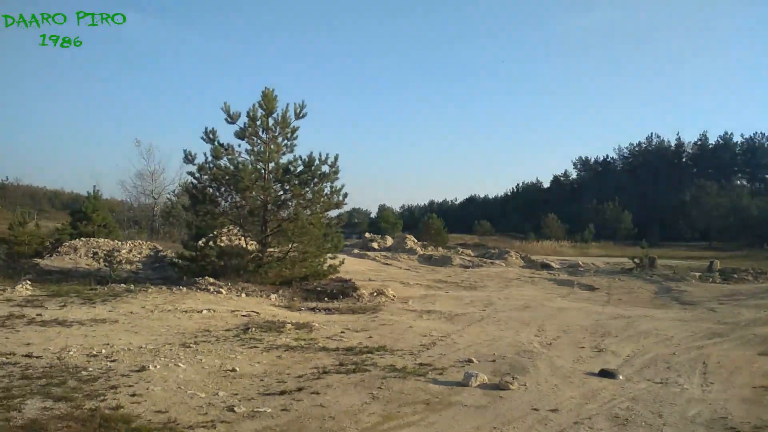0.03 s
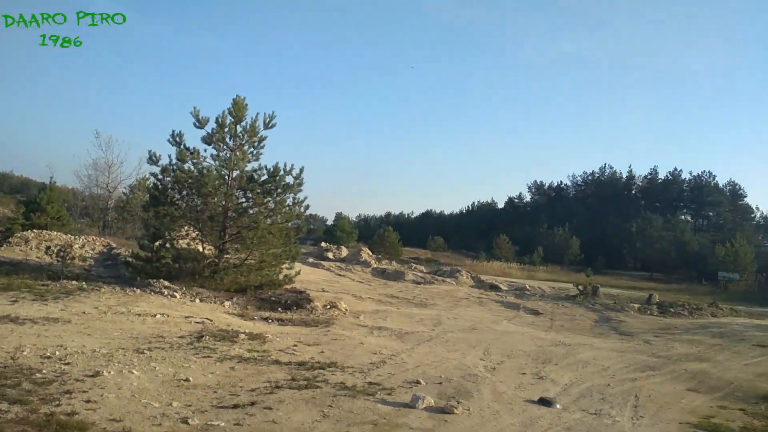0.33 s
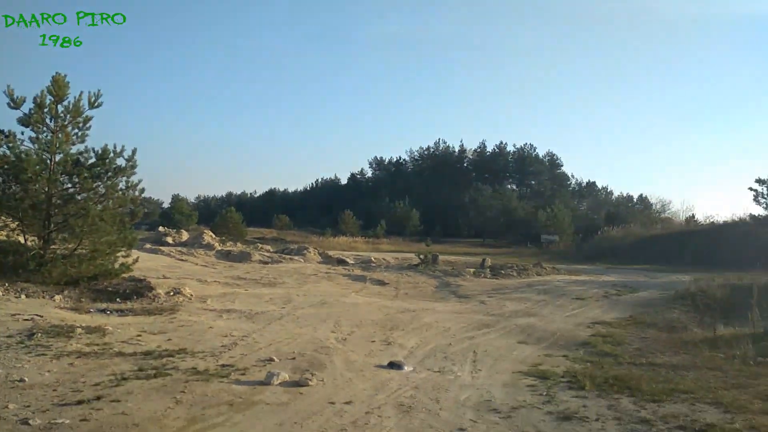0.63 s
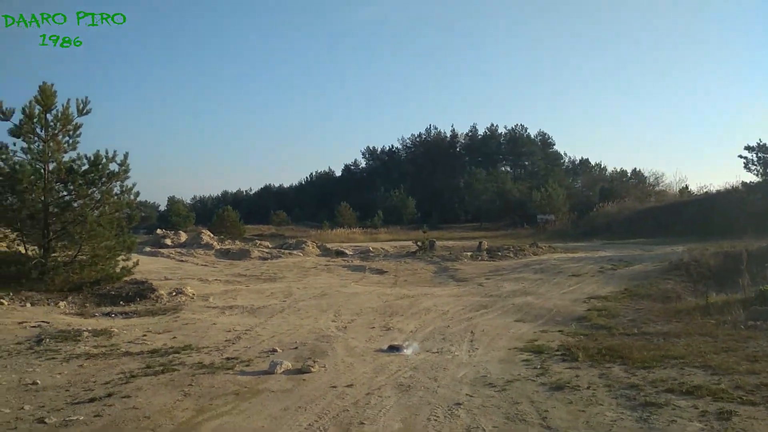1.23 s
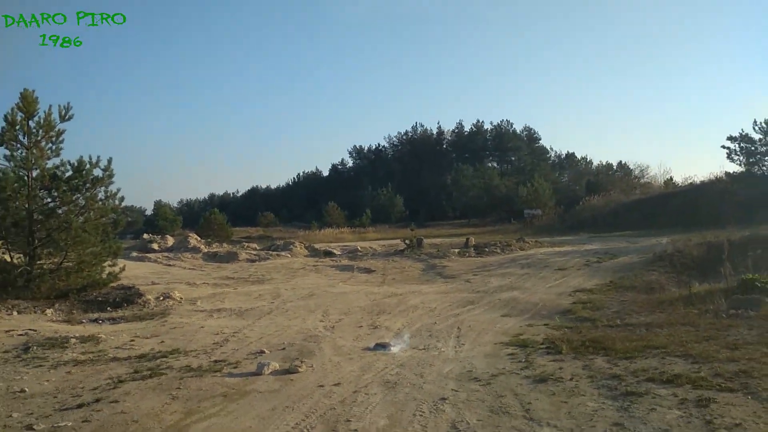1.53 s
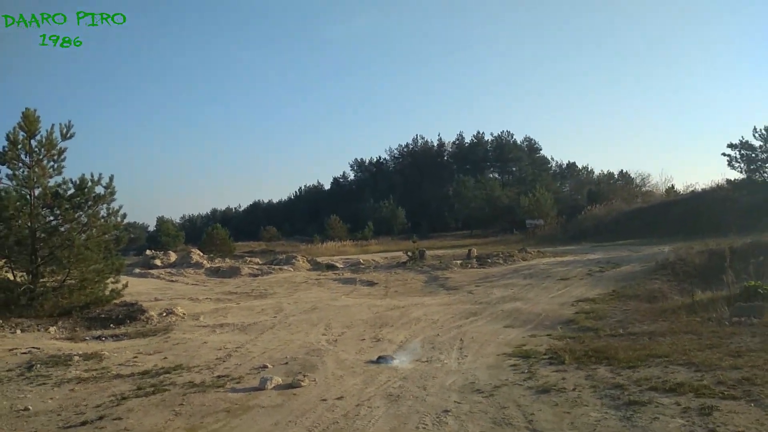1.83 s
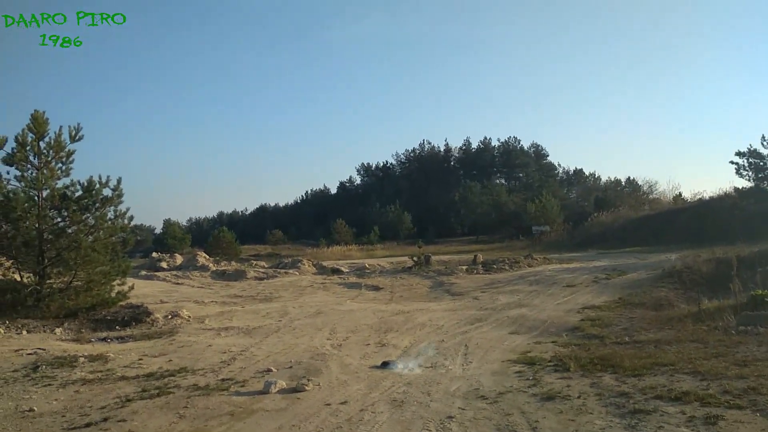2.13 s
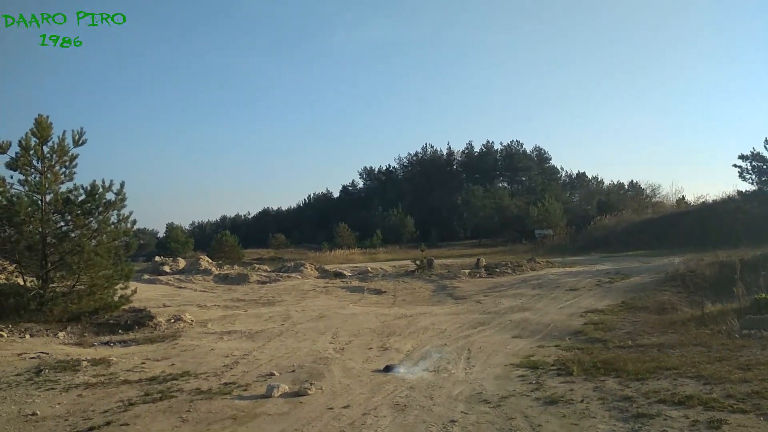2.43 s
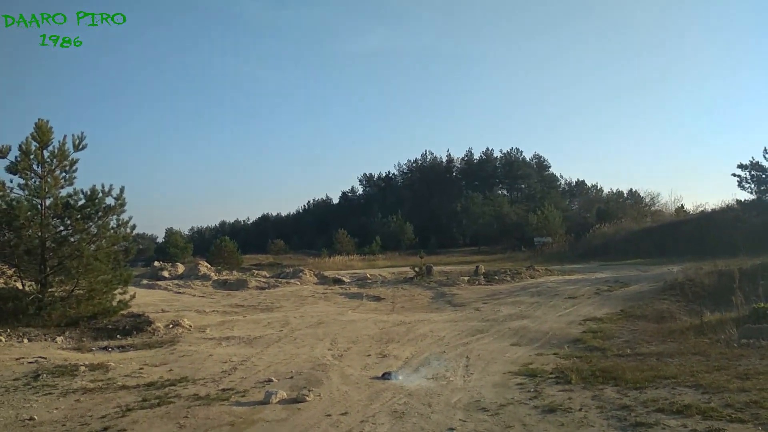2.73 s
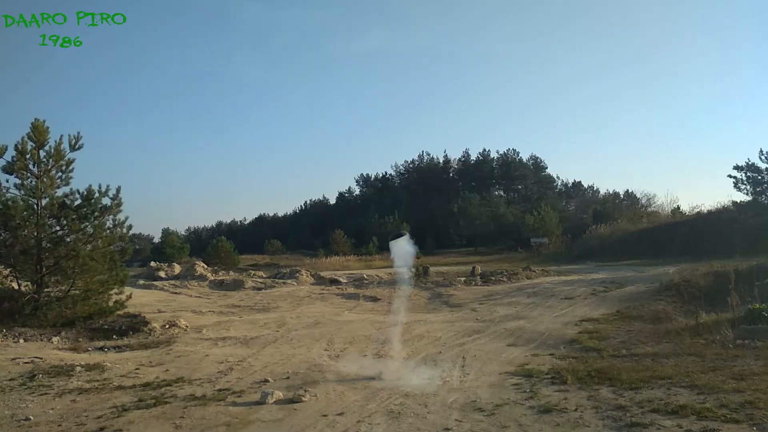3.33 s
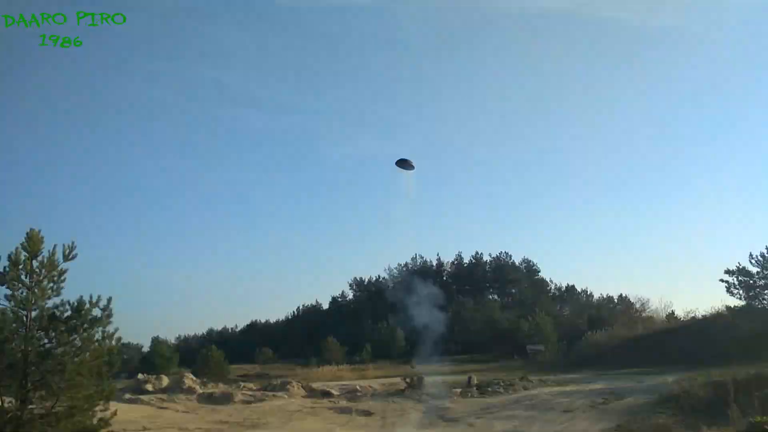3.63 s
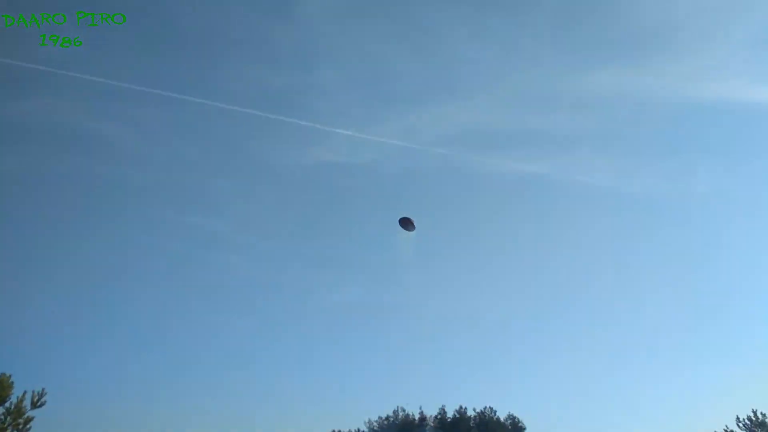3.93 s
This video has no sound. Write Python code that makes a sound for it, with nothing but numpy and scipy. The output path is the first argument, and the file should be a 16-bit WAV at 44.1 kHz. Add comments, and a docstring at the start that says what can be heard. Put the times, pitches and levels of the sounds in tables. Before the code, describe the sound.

One loud firecracker blast outdoors throws a metal bowl upward, ringing and wavering, while sand sprays and echoes rumble back. Before it, shoes scuff softly, a fuse fizzes briefly and light wind buffets the microphone.

```python
"""Firecracker under a metal bowl

Outdoors on sandy ground, light wind on the microphone. Shoes scuff back, a fuse hisses briefly under
the bowl, and only the wind, a few ticks and a far-off call remain. The firecracker goes off with a
sharp double blast and throws the bowl up, ringing as it tumbles. Stone heaps nearby slap the crack
back, banks and trees further out return a rumble and dull echoes, and blown sand hisses in surges."""
import sys
import numpy as np
from scipy import signal
from scipy.io import wavfile

SR = 44100
rng = np.random.default_rng(int(sys.argv[2]) if len(sys.argv) > 2 else 0)


def materialize(psi):
    """Save the field psi as 16-bit PCM at rate SR to the path in sys.argv[1].

    A 1-D psi becomes a single channel; in a 2-D psi each row is a channel.
    """
    bounded = np.clip(np.atleast_2d(psi).T, -1, 1)
    quanta = np.round(bounded * 32767).astype(np.int16)
    wavfile.write(sys.argv[1], SR, quanta)


N = 176400
T = np.arange(N) / SR
BANG_S, BLAST_LOW_HZ = 3.2966, 105

# likeness of the two channels for most noises: (frequency [Hz], correlation [ratio])
LIKENESS = [(40, 0.76), (130, .9), (300, 0.91), (600, 0.37), (1100, 0.28), (2200, 0.11), (5000, 0.23),
            (12000, 0.083)]
# wind on the microphone: (frequency [Hz], density [dB])
WIND_SPECTRUM = [(25, -6.5), (50, -0.5), (85, 1), (130, -7), (220, -15.5), (320, -32.5), (500, -40)]
# gusts: (time [s], level [dB])
WIND_LEVEL = [(0, -51.5), (.3, -49), (.45, -44), (.6, -46.5), (.75, -51), (1.0, -53.5), (1.2, -59),
              (1.5, -58), (1.75, -56), (2.0, -51.5), (2.2, -49.5), (2.48, -55.5), (2.7, -51), (3.0, -51),
              (3.25, -54.5)]
# the wind leans to the right: (frequency [Hz], left minus right [dB])
WIND_PAN = [(30, -8), (90, -3.5), (300, -3.5)]
# likeness of the wind in the two channels: (frequency [Hz], correlation [ratio])
WIND_LIKENESS = [(50, 0.18), (130, 0.87), (300, 0.26), (700, 0.22)]
# soft outdoor wash: (frequency [Hz], density [dB])
WASH_SPECTRUM = [(200, -2.5), (290, 3), (500, -3), (700, -26.5), (1100, -26), (2000, -34.5), (4000, -44)]
# its slow swells: (time [s], level [dB])
WASH_LEVEL = [(0, -71.5), (.8, -63.5), (1.3, -65.5), (1.7, -75), (2.2, -70.5), (2.6, -79.5), (3.2, -78.5)]
# throat resonances of the far caller: (centre [Hz], width [Hz], level [dB])
THROAT_BANDS = [(1487, 132, 1), (1678, 96, -0.5)]
# small dry ticks: (time [s], level [dB], centre [Hz], t60 [s])
TICKS = [(1.553, -73, 1850, 0.084), (1.553, -75.5, 4320, 0.056), (1.554, -60.5, 11860, 0.092),
         (1.832, -69, 1070, 0.1), (2.121, -83, 3200, .03), (2.39, -83, 4320, .06),
         (2.957, -75.5, 4950, .03)]

# sand crushed underfoot: (frequency [Hz], density [dB])
CRUNCH_SPECTRUM = [(150, -8), (400, -5), (900, -2), (1500, 2), (2200, -8.5), (4000, -11.5), (7000, -23.5),
                   (16000, -38.5)]
# grit dragged by the sole: (frequency [Hz], density [dB])
GRIT_SPECTRUM = [(2000, -21), (4500, -13.5), (7000, -4.5), (11000, 4.5), (15500, 5)]
# faint rustle between the steps: (time [s], crunch [dB], grit [dB])
RUSTLE_LEVEL = [(0, -70, -75), (.27, -58, -63.5), (.45, -77, -83), (.6, -65, -66.5), (.85, -73.5, -68),
                (1.03, -82.5, -75), (1.13, -68, -78), (1.22, -80, -79), (1.45, -94, -93.5),
                (1.7, -104, -106), (3.2, -104, -106)]
# shoe scuffs: (start [s], length [s], crunch [dB], grit [dB], top of the crunch [Hz])
SCUFFS = [(0.084, 0.041, -52.5, -52, 9100), (0.183, 0.072, -48, -61.5, 9400),
          (0.295, .016, -37.5, -64.5, 1950), (0.508, 0.04, -38.5, -50, 7140),
          (0.679, 0.074, -55.5, -82, 4700), (1.066, 0.032, -62.5, -69, 6850),
          (1.24, 0.079, -76.5, -90, 2750)]
# stones knocked under the sole: (time [s], peak [dB], centre [Hz])
STONES = [(0.091, -43, 2160), (0.099, -38, 1830), (0.124, -39, 7000), (0.155, -48, 2430),
          (0.1927, -40, 2400), (0.196, -51, 1730), (0.243, -38.5, 2220), (0.299, -41, 2500),
          (.3062, -32, 484), (0.309, -35, 1440), (.311, -34, 930), (.3170, -25.5, 1140),
          (.378, -54.5, 1560), (0.398, -60, 2000), (.471, -57.5, 2500), (.522, -29, 1170),
          (.5254, -21.5, 1430), (0.5858, -47.5, 1400), (0.647, -65, 2800), (0.741, -37.5, 1100),
          (0.751, -41, 1070), (1.087, -45.5, 1770), (1.093, -59, 2180)]
# hiss of the fuse: (centre [Hz], width [Hz], level [dB])
FUSE_BANDS = [(1638, 290, -5), (5150, 630, -12.5), (8480, 570, -3.5), (9500, 720, 1.5), (10880, 900, 5),
              (12300, 900, 1)]
# course of the burn: (time [s], hiss [dB], highest fizz [dB])
FUSE_LEVEL = [(.55, -100, -100), (.72, -68, -88), (.85, -66, -87), (1.03, -68, -75), (1.22, -68, -66.5),
              (1.35, -74.5, -74), (1.46, -79, -88), (1.6, -92, -94), (1.7, -108, -110)]

# long wash from the distant forest: (frequency [Hz], density [dB])
FOREST_SPECTRUM = [(50, -20), (120, 14), (300, -2.5), (700, -8), (2300, -1), (4000, -16), (16000, -16)]
# scatter from the nearer ground and trees: (frequency [Hz], density [dB])
SCATTER_SPECTRUM = [(40, -56), (65, -14), (95, 3.5), (130, 1.5), (250, 3.5), (380, -3.5), (600, -21),
                    (1200, -24.5), (2300, -14.5), (3500, -30), (7000, -27.5), (16000, -22.5)]
# its decay: (frequency [Hz], t60 [s])
SCATTER_T60 = [(60, 1.26), (150, 1.17), (400, 0.61), (1000, 0.79), (2500, 1.32), (10000, 1.2)]
# distinct echoes from banks and trees: (time [s], peak [dB], top [Hz])
ECHOES = [(3.341, -19, 425), (3.368, -17, 424), (3.4, -19.5, 423), (3.43, -13.5, 260), (3.4581, -12.5, 286),
          (3.502, -19.5, 294), (3.518, -18, 298), (3.626, -42, 258), (3.635, -18, 244),
          (3.8987, -35.5, 402), (3.9092, -32, 289)]
# bright slaps from nearby stone heaps: (time [s], level [dB], length [s], centre [Hz])
SLAPS = [(3.35, -28.5, 0.0042, 1340), (3.414, -34, 0.0084, 1290), (3.438, -35, 0.0045, 1300),
         (3.5, -31.5, 0.003, 1510), (3.511, -34, 0.019, 2330), (3.514, -35.5, .005, 1000),
         (3.599, -35, .005, 2020), (3.914, -50, 0.0056, 2200)]
# surges of blown sand: (start [s], rise [s], length [s], t60 [s], middle treble [dB], top [dB])
SAND_SURGES = [(3.292, 0.006, 0.051, .077, -36, -49), (3.313, 0.038, .2, 0.23, -41, -33),
               (3.496, .014, 0.027, .073, -36, -44), (3.527, 0.078, .13, 0.21, -39.5, -35.5),
               (3.624, .004, 0.039, .08, -49, -37.5), (3.675, 0.025, 0.023, 0.53, -47, -42),
               (3.7673, 0.0011, .005, 0.11, -45, -39.5), (3.784, 0.0007, 0.0043, 0.094, -46, -38),
               (3.799, 0.0015, 0.0059, 0.23, -44.5, -31), (3.828, 0.011, 0.03, 0.11, -50.5, -38),
               (3.8983, .001, 0.0037, .024, -64, -42.5), (3.921, 0.018, 0.058, .3, -53, -43.5),
               (3.976, .002, 0.049, 0.14, -50.5, -42)]
# middle treble of the spray: (frequency [Hz], density [dB])
SAND_MID_SPECTRUM = [(1200, -11), (2500, 3.5), (3400, -26), (5000, 9), (7000, 2), (9000, -13)]
# top of the spray: (frequency [Hz], density [dB])
SAND_TOP_SPECTRUM = [(4500, -24.5), (7500, -1.5), (10000, 13), (12500, 8), (15500, -3)]
# modes of the bowl: (frequency [Hz])
BOWL_HZ = [886, 977, 1388, 1746, 2029, 2168, 2197, 2946, 3379, 3970]
# ring of each of those modes: (level [dB], t60 [s])
BOWL_RING = [(-32, 1.4), (-24, 0.67), (-29.5, 0.64), (-36, 0.84), (-36.5, 0.38), (-35.5, 0.52), (-30, 0.42),
             (-41, 0.93), (-45, 0.23), (-38.5, 0.26)]
# pressure pulses of the blast: (delay [s], peak [dB], length [s], top [Hz])
BLAST_PULSES = [(0.0, -7.5, 0.003675, 1320), (.0043, -1, 0.00262, 574)]
# the crack: (frequency [Hz], density [dB])
CRACK_SPECTRUM = [(300, -6.5), (700, -4.5), (1300, -1), (2100, 4.5), (3200, -9.5), (6000, -17), (10000, -7),
                  (16000, -18.5)]
# roar of escaping gas: (frequency [Hz], density [dB])
ROAR_SPECTRUM = [(220, -12.5), (410, 6), (650, -3), (900, -4), (1250, 2.5), (1700, -7), (2500, -27.5)]


def from_db(db):
    """Decibels to gain."""
    return 10 ** (np.asarray(db) / 20)


def rms_one(x):
    """Scale to unit rms."""
    return x / np.sqrt(np.mean(x ** 2) + 1e-20)


def peak_one(x):
    """Scale to unit peak."""
    return x / np.abs(x).max()


def gains(rows):
    """Rows of (time [s], level [dB], ...) as one gain curve per level column."""
    times, *columns = np.transpose(rows)
    return [from_db(np.interp(T, times, db)) for db in columns]


def at_hz(points, hz):
    """Read a table on a log-frequency axis."""
    frequencies, values = np.transpose(points)
    return np.interp(np.log(hz), np.log(frequencies), values)


def panned(left_db):
    """Gains of the two channels for a left-minus-right level."""
    return from_db(left_db / 2 * np.array([[1], [-1]]))


def drift(per_s):
    """A random curve with per_s turning points a second, spread about 1."""
    return np.interp(T * per_s, np.arange(1000), rng.standard_normal(1000))


def filtered(x, hz, kind, order=2):
    """Causal Butterworth filter."""
    sos = signal.butter(order, np.clip(hz, 10, .45 * SR), kind, fs=SR, output="sos")
    return signal.sosfilt(sos, x + 1e-18)


def around(x, hz, ratio):
    """Pass the band from hz / ratio to hz * ratio."""
    return filtered(x, [hz / ratio, hz * ratio], "band")


def envelope(start, rise, hold, t60):
    """Linear rise, then exponential release from start + hold; all in seconds."""
    return np.clip((T - start) / rise, 0, 1) * from_db(-60 * np.maximum(T - start - hold, 0) / t60)


def grains(per_s, spread_db):
    """Two stereo pairs of unrelated streams of random clicks of uneven size."""
    shape = (2, 2, N)
    clicks = (rng.random(shape) < per_s / SR) * rng.choice([-1, 1], shape)
    return clicks * from_db(spread_db * np.minimum(rng.exponential(1, shape), 4))


def coloured(spectrum, source=None, shape=lambda hz: 1, likeness=LIKENESS):
    """Stereo noise or grains in half-octave bands, rms 1 before each band gets its shape in time."""
    source = rng.standard_normal((2, 2, N)) if source is None else source
    edges = 22 * 2 ** np.arange(0, 10, .5)
    out, power = 0, 0
    for k, (low, high) in enumerate(zip(edges, edges[1:])):
        hz = np.sqrt(low * high)
        if spectrum[0][0] / 2 < hz < spectrum[-1][0] * 2:
            gain = from_db(at_hz(spectrum, hz))
            mid, side = gain * filtered(source[k % 2], [low, high], "band", order=3)
            alike = at_hz(likeness, hz)
            band = np.sqrt(1 + alike) * mid + np.sqrt(1 - alike) * side * [[1], [-1]]
            out += band * shape(hz)
            power += np.mean(band ** 2)
    return out / np.sqrt(power)


def open_air():
    """The bed of the place: a soft outdoor wash and a very faint hiss."""
    level, = gains(WASH_LEVEL)
    return level * coloured(WASH_SPECTRUM) + from_db(-93.5) * rng.standard_normal((2, N))


def wind():
    """Lumpy rumble right on the microphone, which the blast also buffets."""
    gusts, = gains(WIND_LEVEL)
    jolt = from_db(-27) * envelope(BANG_S, rise=.004, hold=.011, t60=.31)
    lumps = lambda hz: from_db(3 * drift(12)) * panned(at_hz(WIND_PAN, hz))
    rumble = coloured(WIND_SPECTRUM, shape=lumps, likeness=WIND_LIKENESS)
    return (gusts + jolt) * filtered(rumble, 500, "low")


def far_call():
    """A hoarse call far off, perhaps a crow: uneven pulses and noise through two throat resonances."""
    pitch_hz = 270 * (1 + .031 * drift(89))
    pulses = np.diff(np.floor(np.cumsum(pitch_hz) / SR), prepend=0)
    rasp = rms_one(pulses) + .94 * rng.standard_normal((2, N))
    call = sum(from_db(db) * filtered(rasp, [hz - width / 2, hz + width / 2], "band")
               for hz, width, db in THROAT_BANDS)
    return from_db(-78) * rms_one(call) * envelope(1.994, rise=.04, hold=.23, t60=.28)


def ticks():
    """Tiny gritty contacts, each a click and a short, noisy ring."""
    out, noise = 0, rng.standard_normal((2, N))
    for start, db, hz, t60 in TICKS:
        click = envelope(start, rise=.00091, hold=0, t60=.032) * rms_one(around(noise, hz, 1.31))
        ring = envelope(start, rise=.002, hold=0, t60=t60) * rms_one(around(noise, hz, 1.053))
        out += from_db(db) * (ring + from_db(-5.5) * click)
    return out


def steps():
    """Near the centre, soles crush and drag sand, now and then knocking a stone."""
    crunch = coloured(CRUNCH_SPECTRUM, grains(per_s=2300, spread_db=1.5))
    crunch = rms_one(crunch * from_db(2.5 * drift(160)))  # the crunch comes in clumps
    grit = coloured(GRIT_SPECTRUM, grains(per_s=15000, spread_db=5.5))
    crunch_level, grit_level = gains(RUSTLE_LEVEL)
    out = crunch_level * crunch + grit_level * grit
    for start, length, crunch_db, grit_db, top_hz in SCUFFS:
        scuff = from_db(crunch_db) * filtered(crunch, top_hz, "low") + from_db(grit_db) * grit
        out += scuff * envelope(start, rise=.0083, hold=length, t60=.052)
    for start, db, hz in STONES:
        knock = around(signal.unit_impulse(N, int(start * SR)), hz, 1.31)
        out += from_db(db) * peak_one(knock)
    return out * panned(-.5)


def fuse():
    """To the right, the fuse catches with a thin hiss, flares in a bright, spitting fizz and dies down."""
    hiss_level, fizz_level = gains(FUSE_LEVEL)
    sparks = grains(per_s=15000, spread_db=5.5)[0] * from_db(2 * drift(67))
    hiss = 0
    for hz, width, db in FUSE_BANDS:
        sputter = from_db(db + .5 * drift(29))
        hiss += sputter * filtered(sparks, [hz - width / 2, hz + width / 2], "band", order=3)
    fizz = filtered(sparks, [13200, 15300], "band", order=3)
    return (hiss_level * rms_one(hiss) + fizz_level * rms_one(fizz)) * panned(-5.5)


def reverberation():
    """The blast scatters densely off the ground and trees; the forest beyond returns a long wash."""
    def patchy_decay(hz):
        decay = envelope(BANG_S, rise=.011, hold=.091, t60=at_hz(SCATTER_T60, hz))
        return decay * from_db(1.5 * drift(45))
    near = coloured(SCATTER_SPECTRUM, shape=patchy_decay)
    far = coloured(FOREST_SPECTRUM) * envelope(BANG_S, rise=.074, hold=.074, t60=9.7)
    return from_db(-22) * near + from_db(-44) * far


def echoes(push_s=.004):
    """Banks and trees send back single dull thuds, each a pressure jump that falls into suction."""
    out = 0
    for arrival, db, top_hz in ECHOES:
        age = np.maximum(T - arrival, 0) / push_s
        jump = (T >= arrival) * (1 - age) * np.exp(-np.minimum(age, 20))
        dulled = filtered(jump, top_hz, "low", order=4)
        thud = peak_one(filtered(dulled, BLAST_LOW_HZ, "high", order=3))
        out += from_db(db) * np.roll(thud, int(arrival * SR) - thud.argmax())  # crest at the arrival
    return out


def slaps():
    """The crack comes back off nearby stone heaps in short, smeared bursts."""
    crack = coloured(CRACK_SPECTRUM)
    out = 0
    for start, db, length, hz in SLAPS:
        burst = envelope(start, rise=.0015, hold=length, t60=.026)
        out += from_db(db) * burst * rms_one(around(crack, hz, 1.26))
    return out


def sand():
    """Fine grains blown out by the blast hiss in surges; coarser ones crackle in the spray."""
    mid_level, top_level = 0, 0
    for start, rise, length, t60, mid_db, top_db in SAND_SURGES:
        surge = envelope(start, rise, length, t60)
        mid_level = np.hypot(mid_level, from_db(mid_db) * surge)  # surges add in power
        top_level = np.hypot(top_level, from_db(top_db) * surge)
    clumps_db = 1.5 * drift(110)
    flicker = lambda hz: from_db(clumps_db + 2.5 * drift(40))
    coarse = grains(per_s=160, spread_db=-.5)[0]
    crackle = from_db(-7.5) * rms_one(filtered(coarse, [4500, 13000], "band"))
    mid, top = (coloured(spectrum, grains(per_s=7000, spread_db=2.5), flicker)
                for spectrum in (SAND_MID_SPECTRUM, SAND_TOP_SPECTRUM))
    return mid_level * mid + top_level * (top + crackle) * panned(-2)


def bowl(tumble_hz=7.2, facing_s=3.366):
    """The bowl rings once it is clear of the ground; tumbling makes its modes swell, fade and waver."""
    ring = 0
    for hz, (db, t60) in zip(BOWL_HZ, BOWL_RING):
        phase = rng.uniform(0, 2 * np.pi) + np.array([[0], [np.pi / 3]])
        waver = .47 * np.array([drift(25), drift(23)])
        rise = .072 * np.sqrt(BOWL_HZ[0] / hz)  # higher modes speak sooner
        level = from_db(db + 1.5 * drift(35)) * envelope(BANG_S, rise, hold=.056, t60=t60)
        ring += level * np.sin(2 * np.pi * hz * T + phase + waver)
    tumble = 1 + .26 * np.cos(2 * np.pi * tumble_hz * (T - facing_s))
    flying_off = from_db(-60 * np.maximum(T - 3.88, 0) / .25)
    return ring * tumble * flying_off * panned(1.5)


def n_wave(start, length, top_hz, suction):
    """A jump in pressure, a straight fall into suction and a jump back, rounded off; peak 1."""
    age = (T - start) / length
    pressure = ((age >= 0) & (age < 1)) * (1 - (1 + suction) * age)
    rounded = filtered(pressure, top_hz, "low")
    return peak_one(filtered(rounded, BLAST_LOW_HZ, "high", order=1))


def blast():
    """Two pressure pulses hit the microphone with a tearing crack on top, then a short roar of gas."""
    suctions = (1.23, .15)  # depth of each pulse's suction against its push
    pulses = sum(from_db(db) * n_wave(BANG_S + delay, length, top_hz, suction)
                 for (delay, db, length, top_hz), suction in zip(BLAST_PULSES, suctions))
    crack = coloured(CRACK_SPECTRUM) * envelope(BANG_S, rise=.00013, hold=.0035, t60=.023)
    roar = coloured(ROAR_SPECTRUM) * envelope(BANG_S, rise=.0058, hold=.031, t60=.36)
    return pulses + from_db(-14.5) * crack * panned(-2) + from_db(-25.5) * roar


def scene():
    """Everything that reaches the stereo microphone."""
    quiet_sounds = wind() + open_air() + steps() + fuse() + ticks() + far_call()
    return quiet_sounds + blast() + slaps() + reverberation() + echoes() + bowl() + sand()


def record(dry):
    """The microphone chain rounds the peak of the blast and cuts the top steeply."""
    rounded = 1.062 * np.tanh(dry / 1.124)
    return signal.sosfilt(signal.ellip(10, .1, 80, 15700, fs=SR, output="sos"), rounded)


dry = scene()
out = record(dry)
materialize(out)
```